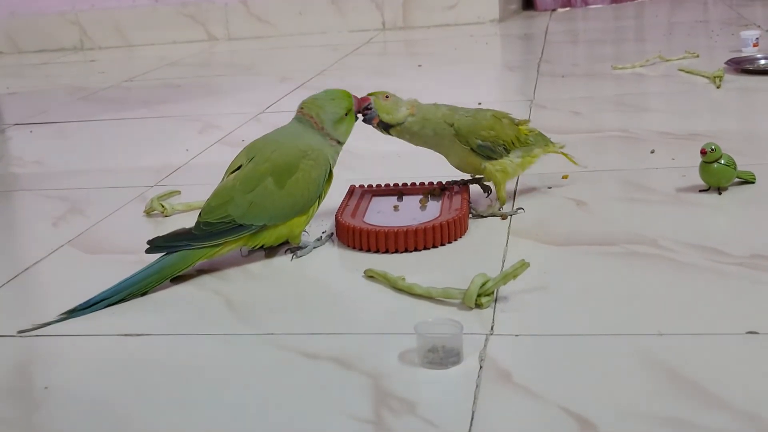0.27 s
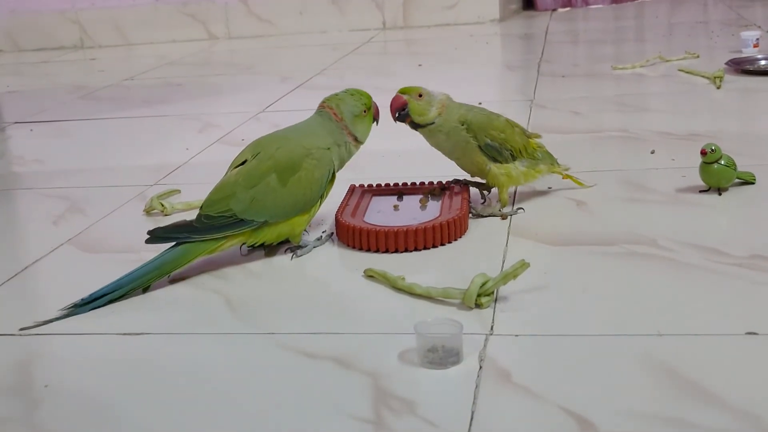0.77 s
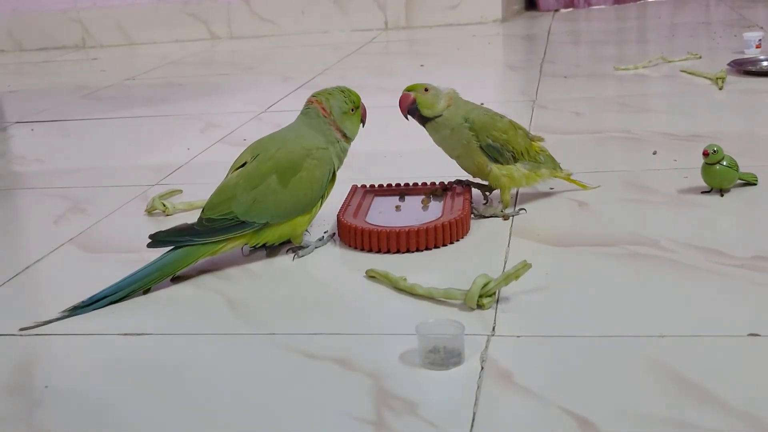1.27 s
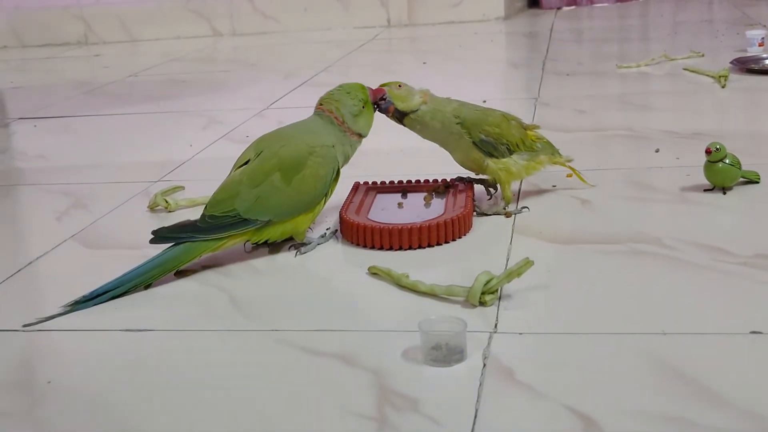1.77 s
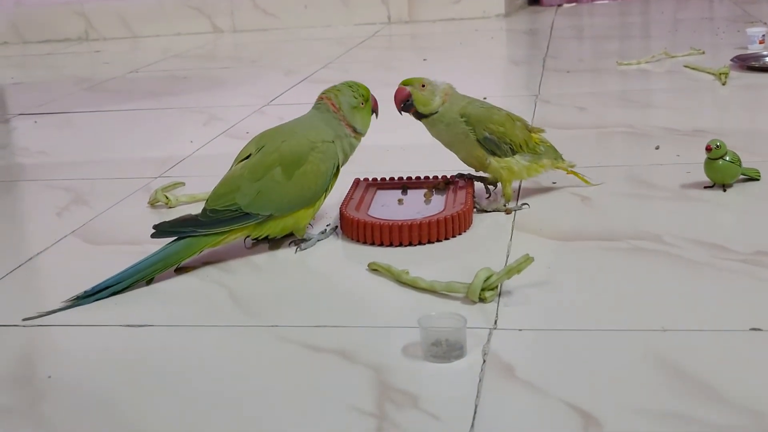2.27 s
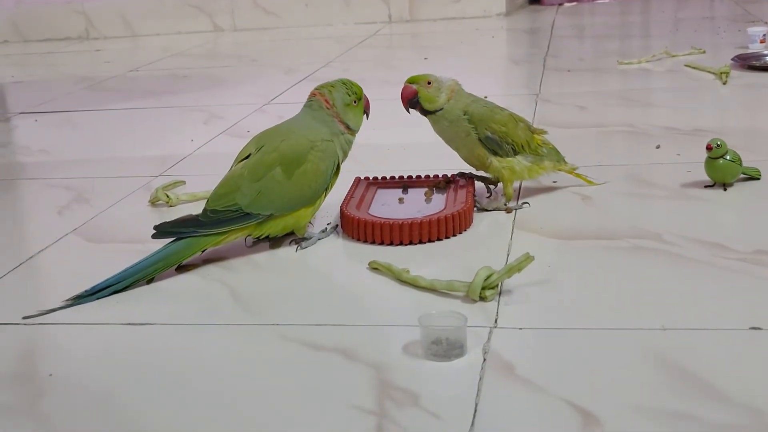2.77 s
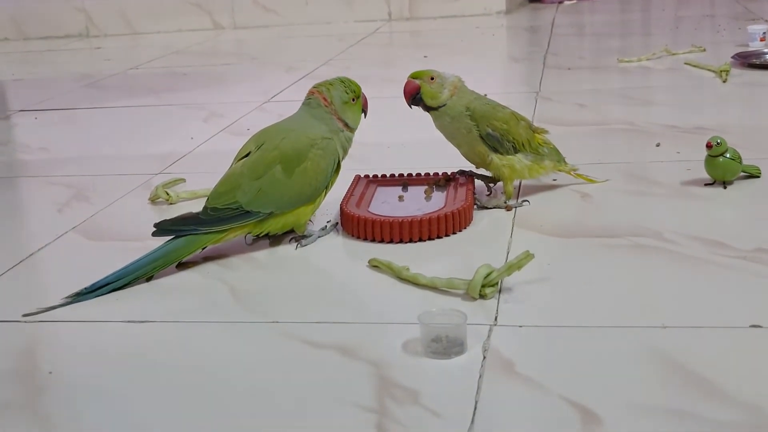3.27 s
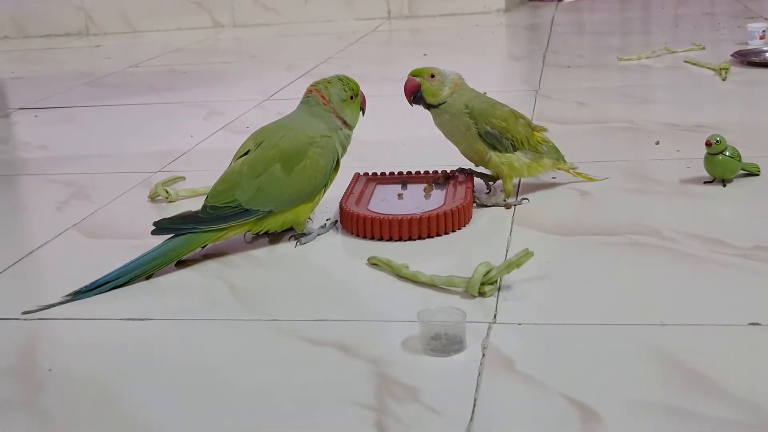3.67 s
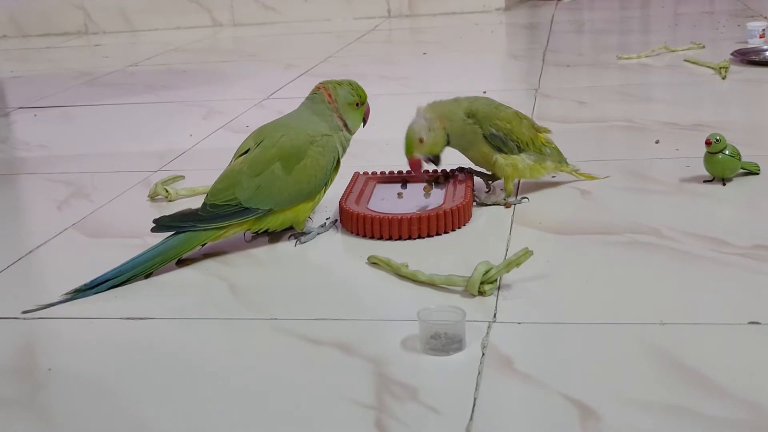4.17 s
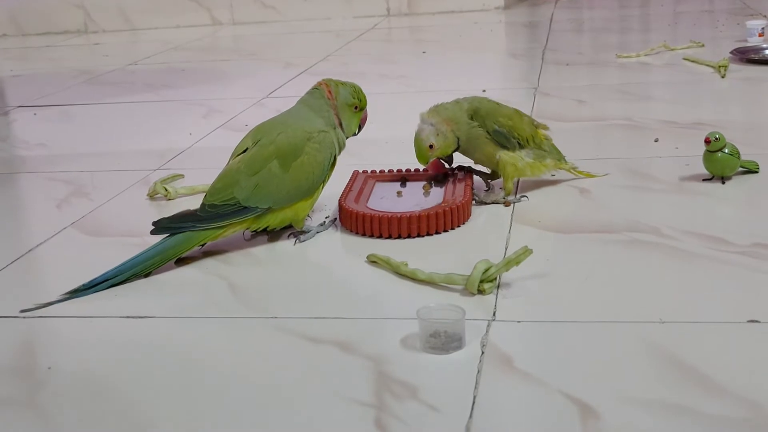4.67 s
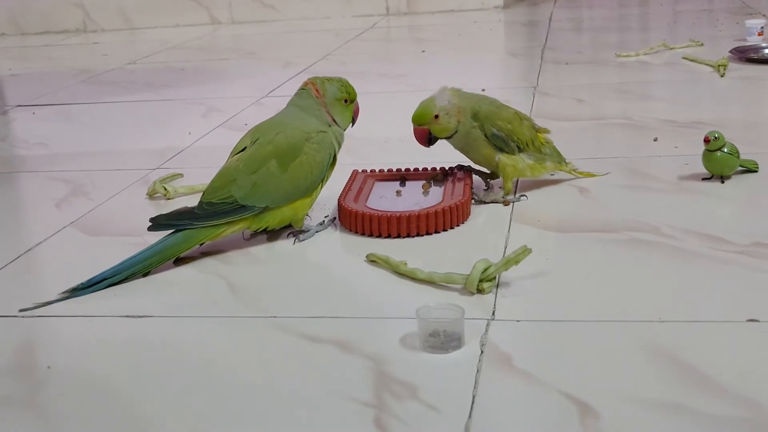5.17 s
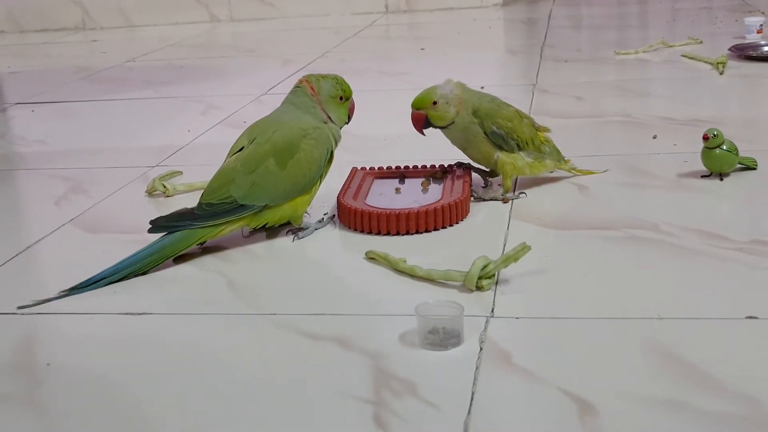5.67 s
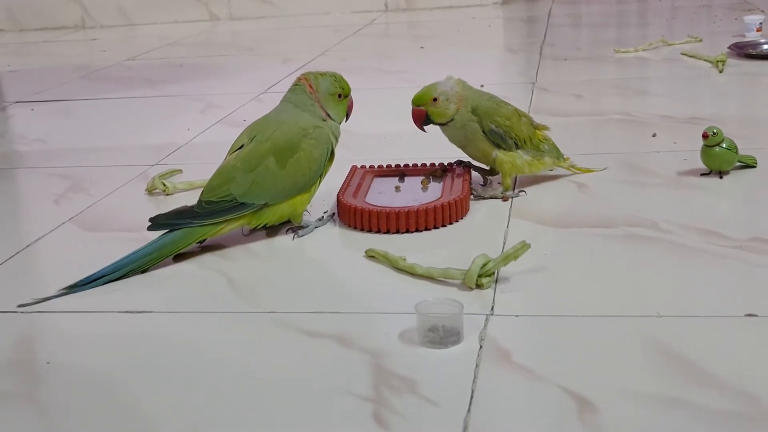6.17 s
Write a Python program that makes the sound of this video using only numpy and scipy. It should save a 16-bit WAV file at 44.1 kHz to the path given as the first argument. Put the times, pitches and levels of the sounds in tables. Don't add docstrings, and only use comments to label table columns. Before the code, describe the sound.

Two pet parakeets on a hard tiled floor. A low, fluttering growl swells into a warble and a falling whistle, then the pattern repeats louder. Small beak and claw ticks follow, then a quick yelp and two cracking yodels. After a short gap, a swelling rasping squawk and a much louder shriek ring out in the bare room, over very faint hum. Phone microphone, fairly near, with dull highs.

```python
import sys
import numpy as np
from scipy import signal
from scipy.fft import rfft, irfft, next_fast_len
from scipy.io import wavfile
from scipy.ndimage import uniform_filter1d, map_coordinates

SR = 44100
rng = np.random.default_rng(int(sys.argv[2]) if len(sys.argv) > 2 else 0)


def to_wav(sig):
    pcm = np.clip(np.atleast_2d(sig), -1, 1) * 32767
    pcm = np.round(pcm).astype(np.int16)
    wavfile.write(sys.argv[1], SR, pcm.T)


def field_ratio(decibels):
    return 10 ** (np.asarray(decibels, dtype=float) / 20)


N = 283563

# (f/Hz, level/dB)
THROAT_COLOUR = [(250, -30), (450, -19.5), (1000, -9), (2000, 5), (2700, 7.5), (3000, 1.5), (3400, -5),
                 (4050, 4), (4700, -7), (5400, -8.5), (6200, -8), (7200, -1), (7950, -2.5), (8400, -13)]

GROWLING = dict(start_hz=69, end_hz=59.23, swing=.05, beat_db=12.5, uneven=0.88, fall_db=-1.5,
                air_db=-13, rough=0.487)
WARBLING = dict(start_hz=41.5, end_hz=42, swing=.11, beat_db=.8, uneven=.02, fall_db=2,
                air_db=-15, rough=.025, late=.17, odd_db=-2)
WHISTLING = dict(start_hz=73.8, end_hz=49.9, swing=0.0024, beat_db=2.5, uneven=0.31, fall_db=-2.5,
                 air_db=-27.5, rough=0.045)
PEEPING = dict(start_hz=90, end_hz=80, swing=0.0086, beat_db=7.5, uneven=0.2, fall_db=-7,
               air_db=-11, rough=0.19)
CHIRPING = dict(start_hz=88.4, end_hz=90, swing=.004, beat_db=0.3, uneven=0.15, fall_db=-7,
                air_db=-24, rough=0.2)
YELPING = dict(start_hz=100, end_hz=75, swing=.004, beat_db=0, uneven=.3, fall_db=-1.8,
               air_db=-13, rough=.06)
YODELING = dict(start_hz=90, end_hz=50, swing=.004, beat_db=0, uneven=.3, fall_db=1,
                air_db=-13, rough=.05, odd_db=-3.5)
SECOND_MEMBRANE = dict(start_hz=90, end_hz=90, swing=.004, beat_db=1.1, uneven=.2, fall_db=-13,
                       air_db=-40, rough=.08)
SWELLING = dict(start_hz=122, end_hz=124.2, swing=.11, beat_db=6.5, uneven=.01, fall_db=-2,
                air_db=-8.5, rough=.2, odd_db=-3)
RASPING = dict(start_hz=121, end_hz=83, swing=.06, beat_db=4, uneven=.025, fall_db=0,
               air_db=-11, rough=.12, odd_db=-5)
SECOND_RASPING = dict(start_hz=92.3, end_hz=99.2, swing=0.055, beat_db=3, uneven=.4, fall_db=1.5,
                      air_db=-11.5, rough=0.6)
SHRIEKING = dict(start_hz=91, end_hz=90, swing=.002, beat_db=0, uneven=.1, fall_db=-1.5,
                 air_db=-25, rough=.03)
SLIDING = dict(start_hz=116, end_hz=165, swing=.004, beat_db=0.4, uneven=.3, fall_db=-.5,
               air_db=-26, rough=.04, odd_db=-5)
ARCHING = dict(start_hz=40, end_hz=40.5, swing=.058, beat_db=-1.5, uneven=.04, fall_db=.6,
               air_db=-17, rough=.07, odd_db=-6, taut=6)


def unit(x):
    return x / np.sqrt(np.mean(x ** 2) + 1e-20)


def along(points, hz):
    f, v = np.transpose(points)
    return np.interp(np.log(hz + 1), np.log(f + 1), v)


def wobble(rate, count=N):
    return map_coordinates(rng.standard_normal(8192), [np.arange(count) * rate / SR])


def filtered(x, response):
    m = next_fast_len(N + SR // 2)
    return irfft(rfft(x, m) * response(np.fft.rfftfreq(m, 1 / SR)), m)[..., :N]


def rush(spectrum, patchy_db):
    z = signal.stft(rng.standard_normal(N + 512), nperseg=512)[2]
    patches = uniform_filter1d(rng.standard_normal(z.shape), size=4, axis=0)
    patches = uniform_filter1d(patches, size=6, axis=1)
    x = signal.istft(z * field_ratio(patchy_db * unit(patches)), nperseg=512)[1][:N]
    return unit(filtered(x, lambda hz: field_ratio(along(spectrum, hz))))


def hum():
    # (f/Hz, level/dB per Hz)
    murmur_colour = [(250, -37), (340, -17.5), (490, -27.5), (600, -13), (760, 2), (1000, -7),
                     (1300, -32.5), (1700, -17.5), (2200, -10.5), (2600, -15), (2900, -48), (5500, -46),
                     (7400, -25.5), (8500, -49.5)]
    # (t/s, level/dB)
    murmur_level = [(0, -59.5), (1.4, -60), (2.8, -59.5), (4.1, -61.5), (5.2, -60.5), (6.43, -60)]
    # (f/Hz, level/dB per Hz)
    rumble_colour = [(15, -49.5), (25, -23.5), (43, -19), (60, -8), (86, 0), (124, -7.5), (210, 1),
                     (257, -8), (330, -13.5), (430, -44.5), (730, -120)]
    # (f/Hz, level/dB)
    motors = [(75, -81.5), (100, -81.5), (146, -80), (215, -79)]
    # (t/s, lift/dB, half length/s)
    house_bumps = [
        (0.681, 15.5, .07),
        (1.505, 6.5, 0.52),
        (4.749, 12, 0.1),
        (5.257, 11, 0.32),
        (6.044, 17.5, 0.2),
        (6.43, 11, 0.25),
    ]
    t = np.arange(N) / SR
    murmur_db = np.interp(t, *np.transpose(murmur_level)) + 1.1 * wobble(5.6)
    murmur = field_ratio(murmur_db) * rush(murmur_colour, patchy_db=2.5)
    drone = np.zeros(N)
    for hz, db in motors:
        drone += field_ratio(db + 2.0 * wobble(0.9)) * np.sin(2 * np.pi * hz * t + 1.2 * wobble(4.5))
    rumble_db = -72 + 0.3 * wobble(3.1)
    for s, db, half in house_bumps:
        rumble_db += db * np.clip(1 - np.abs(t - s) / half, 0, 1)
    return murmur + drone + field_ratio(rumble_db) * rush(rumble_colour, patchy_db=3.5)


def call(rows, start_hz, end_hz, swing, beat_db, uneven, fall_db, air_db, rough, air,
         late=0, odd_db=0, taut=0):
    s, hz, db, over_db = np.transpose(rows)
    n = int((s[-1] - s[0]) * SR)
    t = np.arange(n) / SR + s[0]

    def soft(v):
        return uniform_filter1d(np.interp(t, s, v), size=220, mode="nearest")

    glide = np.exp(soft(np.log(hz)))
    db, over_db = soft(db), soft(over_db)
    slackness = glide / glide.max()
    rate = np.interp(t, s[[0, -1]], [start_hz, end_hz]) * np.exp(uneven * wobble(60, count=n))
    turn = 2 * np.pi * (np.cumsum(rate) / SR - late)

    tremble = 0.1575 * rough * wobble(900, count=n)
    flutter = np.tanh(1.3 * np.sin(turn)) / np.tanh(1.3)
    swung = glide * (1 - swing * slackness ** taut * flutter)
    phase = 2 * np.pi * np.cumsum(swung + glide * tremble) / SR
    beats = unit(field_ratio(beat_db * -np.cos(turn) + (0.95 + rough) * wobble(159.6, count=n)))

    tone = np.sin(phase) + field_ratio(air_db + np.maximum(over_db, 0)) * air[:n]
    fall_db = fall_db + 4.5 * np.log2(slackness)
    for k in range(2, 12):
        pipe_db = along(THROAT_COLOUR, k * swung)
        pipe_db -= np.maximum(along(THROAT_COLOUR, 2 * glide), -3 if k > 2 else -60)
        pipe_db -= .06 * np.maximum(k * swung - 8050, 0)
        level_db = over_db + pipe_db + (k - 2) * fall_db + k % 2 * odd_db + 0.17 * wobble(97, count=n)
        tone += field_ratio(level_db) * np.sin(k * phase + k * k) * (k * glide < 9500)
    edge = np.clip(np.minimum((t - s[0]) / 0.0042, (s[-1] - t) / 0.00076), 0, 1)
    return np.sqrt(2) * field_ratio(db) * edge * beats * tone


def gestures():
    # (t/s after the onset, f/Hz, fundamental level/dB, overtones over it/dB)
    growl = [(0, 717, -67, -10.5), (.08, 745.4, -65.5, -8.5), (.25, 821, -65, -8), (.4, 866, -64.5, -9),
             (.485, 912, -61, -6)]
    warble = [(0, 987, -39.5, -14), (.022, 1036, -41, -6), (.055, 1065, -40, -4), (.09, 1161, -42.5, -2.5),
              (.118, 1290, -45.5, -0.5), (.145, 1413, -53.5, 2)]
    whistle = [(0, 1426, -47, 0.5), (.01, 1410, -41, 3), (.04, 1326, -37.5, 2.5), (.09, 1310, -40.5, -5),
               (.133, 1278, -44.5, -2.5), (.16, 1188, -41, 4), (.18, 850, -46.5, -28.5),
               (.192, 494, -51.5, 5.5), (.2, 373, -60.5, 2.5)]
    yelp = [(0, 1381, -33.5, 2), (.007, 1361, -36, 1.5), (.022, 1347, -35, 7), (.028, 832, -33.5, 3),
            (.039, 553, -31.5, -16), (.054, 557, -45.5, -20), (.079, 654, -53.5, -5)]
    undertone = [(0, 2188, -56, 12), (.08, 2214, -56.5, 15), (.115, 2105, -55, 20)]
    swell = [(0, 761.7, -69, -13), (.1, 949, -54.5, -8.5), (.17, 1120, -45.5, 0.5), (.22, 1285, -38.5, 0.5),
             (.255, 1650, -37.5, -0.5), (.285, 1970, -33, 7.5), (.325, 2024, -29, 7)]
    rasp = [(0, 2042, -27, 4.5), (.04, 2179, -26, 2), (.08, 2187, -26.5, 6), (.15, 2055, -28.5, 9.5),
            (.2, 1984, -30.5, 10.5), (.243, 1894, -37, 12), (.254, 1288, -34, 5), (.274, 553, -40, -16.5)]
    after_rasp = [(0, 1414, -49, 11), (.06, 1408, -43.5, 13), (.14, 1362, -50, 12)]
    leap = [(0, 474, -47, -6), (.015, 633, -48.5, -10), (.033, 906, -50.5, -12.5), (.041, 1230, -41, 9),
            (.05, 1737, -38, 2.5), (.056, 2030, -27.5, 11), (.062, 2315, -30, -5), (.067, 2520, -31.5, -15)]
    shriek = [(0, 2437, -19, -10.5), (.035, 2379, -26.5, -2), (.085, 2455, -22, -4.5),
              (.115, 2354, -28.5, -2.5), (.13, 2144, -29.5, 16), (.15, 1960, -24.5, 5.5),
              (.185, 1805, -25, 1.5), (.21, 1582, -33, 10.5), (.225, 1285, -44, 12)]
    slide = [(0, 2353, -24, -4.5), (.053, 2288, -27, -8.5), (.093, 2274, -28, -1.5),
             (.123, 2118, -25.5, 7.5), (.153, 1986, -27, 7.5), (.183, 1840, -30, 2), (.213, 1704, -31.5, 6),
             (.238, 1535, -33, 1.5)]
    arch = [(0, 1600, -31, -8), (.036, 1312, -37, 6.5), (.063, 1480, -34.5, 1), (.103, 1530, -31.5, 1),
            (.193, 1570, -30.5, 3), (.243, 1440, -30, 7), (.293, 1275, -33, 10), (.323, 1010, -34, 2),
            (.343, 486, -48, -16)]
    # (onset t/s, stretch in time, stretch in pitch, level/dB)
    growl_times = [
        (.22, 0.9, 1, 0.5),
        (1.74, .8, 1.001, 4),
    ]
    warble_times = [
        (.71, .97, 1, 0.019),
        (2.133, 1.1, 1.001, .1),
    ]
    whistle_times = [
        (.914, 1, 1, -1),
        (2.357, 1.02, 1.003, 1.34),
    ]
    undertone_times = [
        (3.269, .37, .63, -8),
        (5.335, 1, 1, 2.5),
    ]

    def once(s):
        return [(s, 1, 1, 0)]

    sung = [
        (growl, growl_times, GROWLING),
        (warble, warble_times, WARBLING),
        (whistle, whistle_times, WHISTLING),
        (yelp, once(3.047), YELPING),
        (undertone, undertone_times, SECOND_MEMBRANE),
        (swell, once(4.28), SWELLING),
        (rasp, once(4.605), RASPING),
        (after_rasp, once(4.79), SECOND_RASPING),
        (leap, once(5.205), CHIRPING),
        (shriek, once(5.325), SHRIEKING),
        (slide, once(5.567), SLIDING),
        (arch, once(5.857), ARCHING),
    ]
    calls = []
    for shape, times, manner in sung:
        for s, stretch, shift, db in times:
            calls.append((np.array(shape) * [stretch, shift, 1, 1] + [s, 0, db, 0], manner))
    return calls


def rings(rows, t60, crack, rise=0.000071, overtone=0):
    out, t = np.zeros(N), np.arange(1300) / SR
    for s, db, hz in rows:
        hit = np.sin(2 * np.pi * hz * t) + overtone * np.sin(4 * np.pi * hz * t)
        hit += crack * rng.standard_normal(len(t))
        out[round(s * SR):][:len(t)] += field_ratio(db - 60 * t / t60) * (1 - np.exp(-t / rise)) * hit
    return out


def growl_throbs():
    # (t/s, peak level/dB, f/Hz)
    throbs = [(.358, -51, 723), (0.397, -50, 719), (.411, -59, 764), (.426, -49, 776),
              (0.443, -52, 800), (0.459, -46.5, 820), (.47, -58, 760), (0.489, -52, 774),
              (.498, -51, 795), (.51, -65, 776), (.528, -54, 780), (0.555, -45.5, 775),
              (.566, -49, 790), (0.586, -54, 877), (0.6, -47.5, 766), (.609, -46, 840),
              (.618, -51, 850), (.628, -53, 910), (.644, -50.5, 850), (0.689, -47, 965),
              (0.712, -40.5, 897),
              (1.77, -48, 870), (1.788, -49, 760), (1.852, -48, 700), (1.898, -39.5, 775),
                     (1.932, -46, 720), (1.946, -41, 820), (1.977, -42, 942.5), (1.995, -40.5, 767),
                     (2.027, -41, 805), (2.051, -42, 870), (2.07, -42, 1060), (2.086, -38, 904),
                     (2.099, -44, 905), (2.132, -35.5, 920)]
    return field_ratio(14.5) * rings(throbs, t60=.014, crack=.06, rise=.0016, overtone=.25)


def claw_ticks():
    # (t/s, peak level/dB, f/Hz)
    taps = [(1.1114, -43, 7580), (1.2406, -53, 7570), (1.3887, -49.5, 7360), (1.768, -60.5, 7297),
            (2.1405, -46, 7630), (2.5686, -45.5, 7550), (2.688, -53, 7240), (2.706, -48.5, 7680),
            (3.1494, -57, 6650), (3.5069, -51, 7530), (3.551, -45, 7400), (3.8601, -49.5, 7720)]
    return field_ratio(4.0) * rings(taps, t60=0.014, crack=0.18)


def peeps():
    # (onset t/s, length/s, f/Hz, level/dB, overtones over it/dB)
    peep_times = [
        (1.643, 0.01, 1705, -57.5, -10),
        (1.717, 0.016, 468.3, -49.5, -0.5),
        (2.839, .019, 739, -37.5, -9.5),
        (3.548, 0.012, 610, -49, 5),
    ]
    calls = []
    for s, length, hz, db, over_db in peep_times:
        rows = [(s, hz, db, over_db), (s + length, hz * 0.98, db - 8, over_db)]
        calls.append((np.array(rows), PEEPING))
    return calls


def snaps():
    # (t/s, peak level/dB, f/Hz)
    snap_times = [
        (1.647, -45, 1590),
        (1.719, -48.5, 863),
        (2.84, -48, 760),
        (3.548, -32, 716),
        (5.212, -41.5, 2080),
    ]
    struck = rings(snap_times, t60=0.012, crack=0.22)
    return filtered(struck, lambda hz: 1 / (1 + (hz / 3300) ** 6))


def chirps():
    # (onset t/s, length/s, top f/Hz, first level/dB, last level/dB)
    chirp_times = [
        (2.967, 0.049, 903, -42.5, -46),
        (3.211, 0.022, 1274, -53, -55),
        (5.426, 0.049, 1495, -50.5, -48.5),
        (5.804, 0.053, 1600, -47, -33),
    ]
    slack_hz = 412
    u = np.arange(9) / 8
    calls = []
    for s, length, hz, first_db, last_db in chirp_times:
        growth_db = last_db - first_db
        octaves = u * np.log2(hz / slack_hz)
        db = first_db + growth_db * u + (3.5 - 0.36 * growth_db) * np.sin(np.pi * u)
        over_db = -8 + 20.5 * np.sin(octaves * .75) ** 2 - 26 * u ** 6
        calls.append((np.c_[s + length * u, slack_hz * 2 ** octaves, db, over_db], CHIRPING))
    return calls


def yodels():
    # (t/s after it starts, f/Hz, fundamental level/dB, overtones over it/dB)
    broken = [(0, 1450, -35, 0), (.012, 1185, -40, 7), (.028, 835, -31, -5), (.042, 1007, -38, 3),
              (.054, 1330, -41, 0), (.066, 975, -36, -6), (.08, 460, -42, -6), (.092, 385, -52, -8)]
    # (onset t/s, break t/s, opening f/Hz, held f/Hz, opening overtones/dB)
    yodel_times = [
        (3.26, 3.309, 1588, 1574, 3.5),
        (3.579, 3.638, 1339, 1481, 7),
    ]
    settle_s = 0.0237
    calls = []
    for s, snap, opening_hz, held_hz, over_db in yodel_times:
        held = [(s, opening_hz, -41.5, over_db), (s + settle_s, held_hz, -30, -10.5)]
        calls.append((np.r_[held, np.array(broken) + [snap, 0, 0, 0]], YODELING))
    return calls


def parakeets():
    open_beak, shut_beak, deep_throat = np.zeros((3, N))
    air = rush(THROAT_COLOUR, patchy_db=-4.0)
    dull = filtered(air, lambda hz: 1 / (1 + (hz / 4350) ** 24))
    for rows, manner in gestures() + peeps() + chirps() + yodels():
        start = round(rows[0][0] * SR)
        loudest_so_far = np.maximum.accumulate(rows[:, 2])
        level_db = np.interp(np.arange(start, N) / SR, rows[:, 0], loudest_so_far)
        effort = np.clip(field_ratio(1.1 * (level_db + 34.5)), 0, 1)
        voice = call(rows, air=dull[start:] + effort * (air - dull)[start:], **manner)
        muffled = np.clip(1 - np.arange(len(voice)) / SR / 0.31, 0, 1) * (manner is GROWLING)
        mouth = shut_beak if manner in (GROWLING, WARBLING) else open_beak
        mouth[start:start + len(voice)] += voice * (1 - muffled)
        deep_throat[start:start + len(voice)] += voice * muffled
    through_beak = filtered(shut_beak, lambda hz: np.maximum(1 / (1 + (hz / 4650) ** 20), field_ratio(-16)))
    through_throat = filtered(deep_throat, lambda hz: 1 / (1 + (hz / 3670) ** 24))
    return open_beak + through_beak + through_throat


def room(x, wet_db):
    # (f/Hz, t60/s)
    wall_decay = [(300, 0.36), (1000, 0.31), (2500, 0.42), (4000, 0.38), (6000, 0.55), (8500, 0.18)]
    # (delay t/s, level/dB)
    near_echoes = [(.0011, -24), (.0072, -18), (0.0138, -10), (.0205, -16), (.03, -15), (.044, -17)]
    hz, t, z = signal.stft(rng.standard_normal(SR), SR, nperseg=256)
    decay = field_ratio(-60 * t / along(wall_decay, hz)[:, None])
    tail = signal.istft(z * decay, SR, nperseg=256)[1][:SR]
    tail *= 1 - np.exp(-np.arange(SR) / SR / 0.00043)
    answer = field_ratio(wet_db) * tail / np.linalg.norm(tail)
    for delay, db in near_echoes:
        answer[int(delay * SR)] += field_ratio(db)
    return x + signal.fftconvolve(x, answer)[:N]


def hushed(x, depth_db):
    # (f/Hz, level/dB)
    mute_below = [(400, -62), (800, -83.5), (1400, -71), (2300, -99), (3100, -88), (5500, -61.5),
                  (7400, -55), (8500, -84.5)]
    hz, _, z = signal.stft(x, SR, nperseg=512)
    power = uniform_filter1d(np.abs(z) ** 2, size=3, axis=0)
    power = np.abs(uniform_filter1d(power, size=5, axis=1))
    noise_power = field_ratio(along(mute_below, hz) - 23.0)[:, None] ** 2
    keep = power / (power + noise_power)
    return signal.istft(z * np.maximum(keep, field_ratio(depth_db)), SR, nperseg=512)[1][:N]


def scene():
    near = parakeets() + growl_throbs() + claw_ticks() + snaps()
    near = filtered(near, lambda hz: 1 / (1 + (260 / (hz + 1)) ** 4))
    heard = room(near, wet_db=-5.3)
    return (field_ratio(-0.34) * hushed(heard, depth_db=-32.5) + hum())[None]


def top_cut(x):
    return signal.sosfilt(signal.butter(12, 8740, fs=SR, output="sos"), x)


def record(dry):
    # (f/Hz, level/dB)
    capsule_curve = [(300, 0), (600, -0.5), (7500, 0.5), (8000, -14), (8500, -21.5), (8740, -46)]
    mix = filtered(dry, lambda hz: field_ratio(along(capsule_curve, hz) * (hz > 300)) * (hz < 8750))
    return top_cut(mix)


dry = scene()
out = record(dry)
to_wav(out)
```